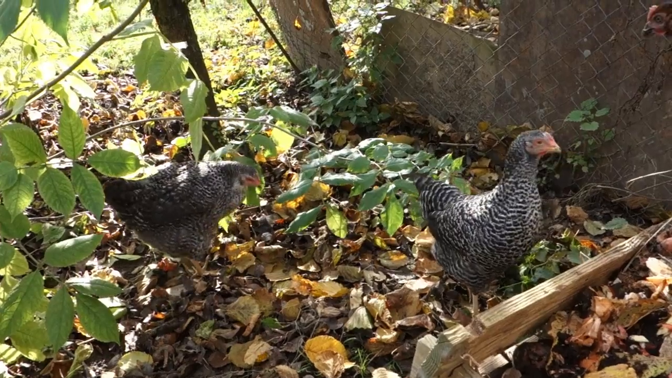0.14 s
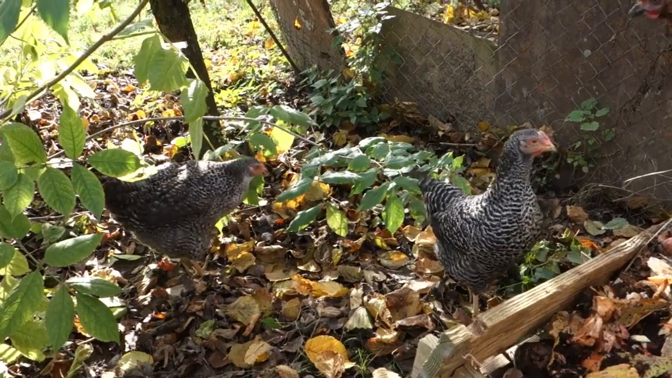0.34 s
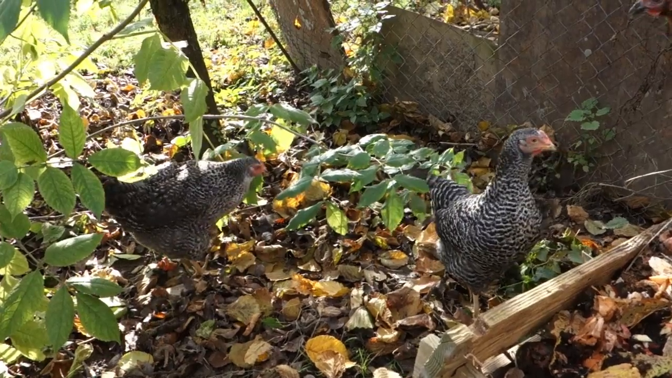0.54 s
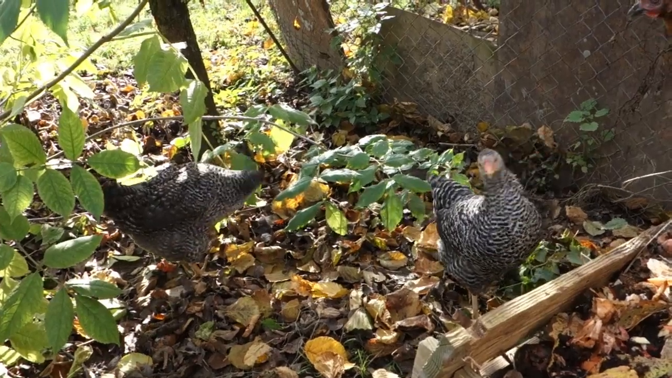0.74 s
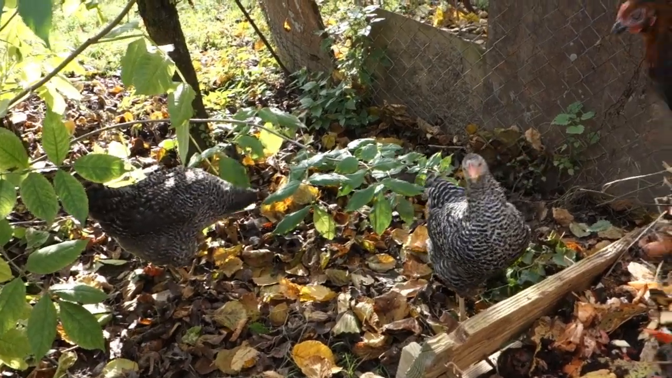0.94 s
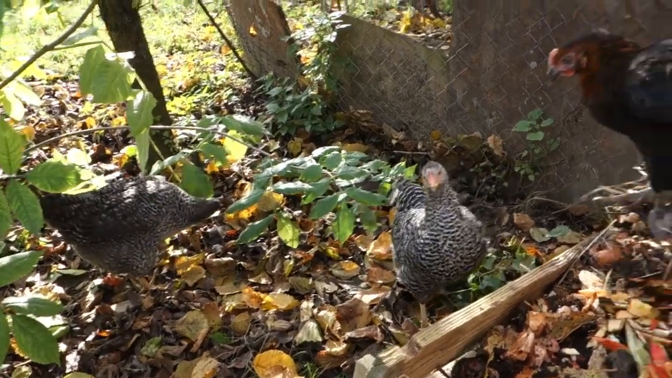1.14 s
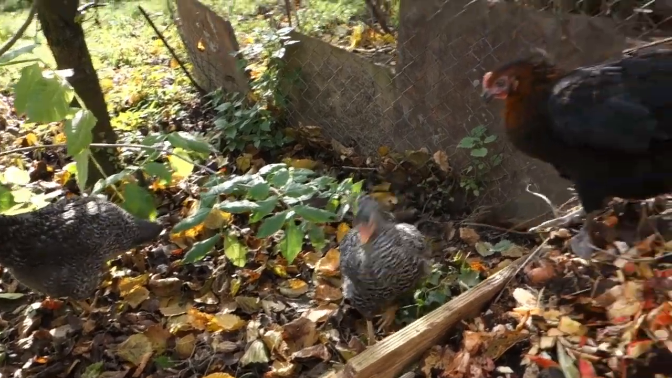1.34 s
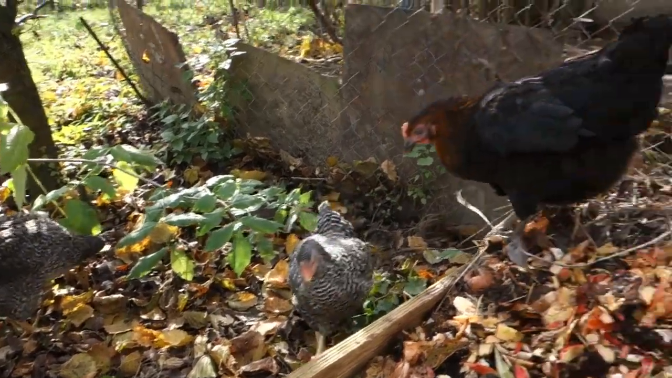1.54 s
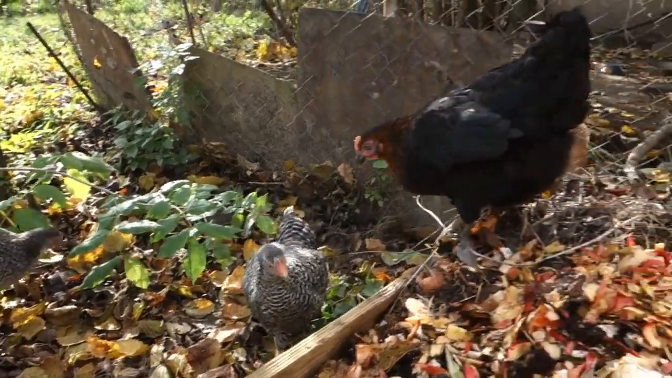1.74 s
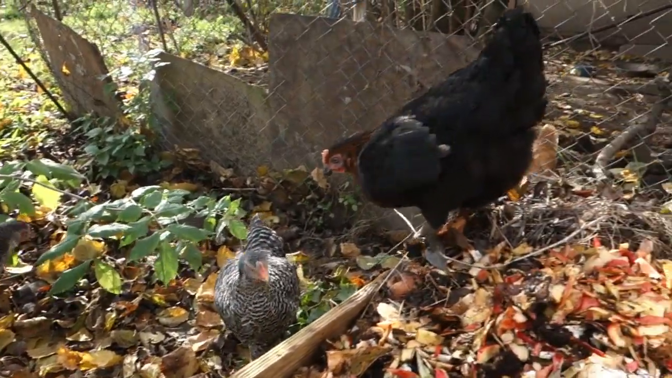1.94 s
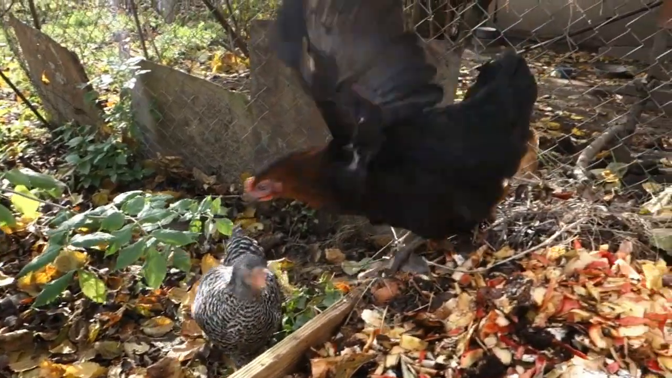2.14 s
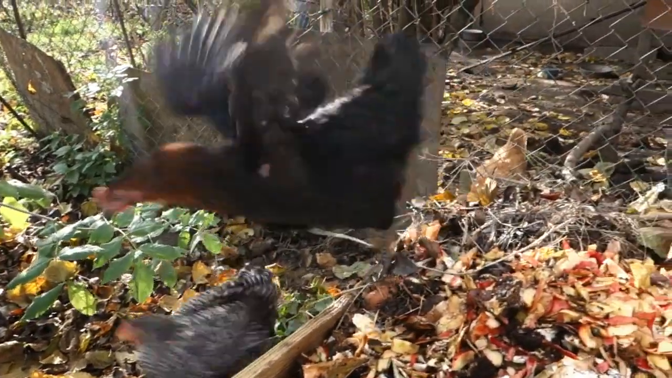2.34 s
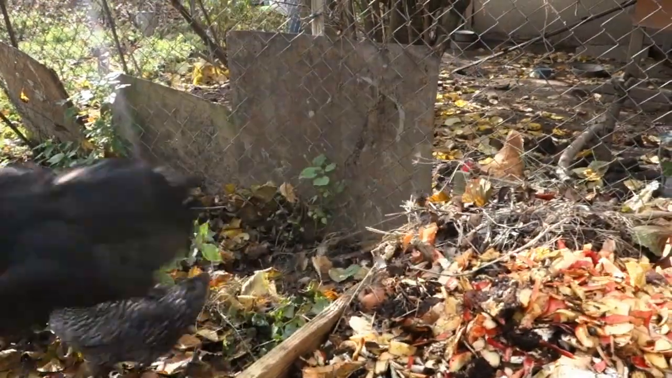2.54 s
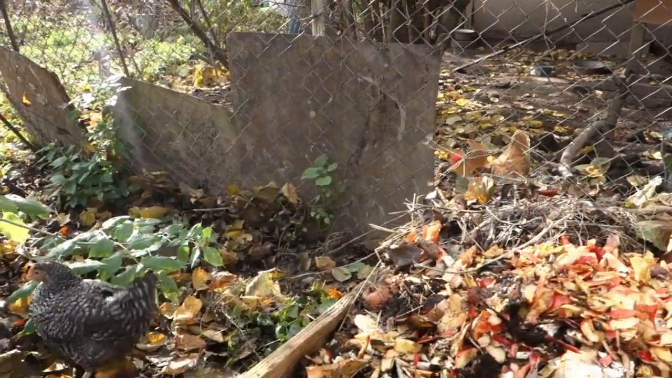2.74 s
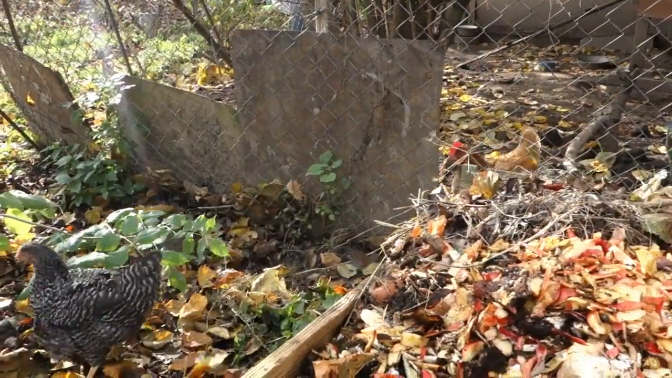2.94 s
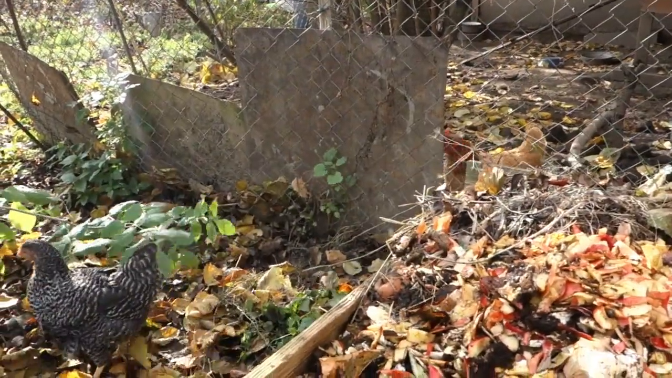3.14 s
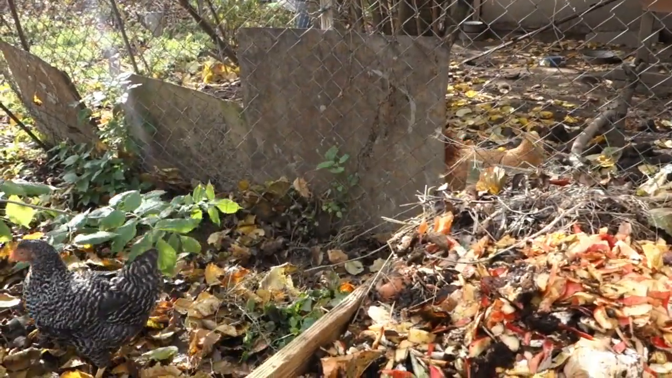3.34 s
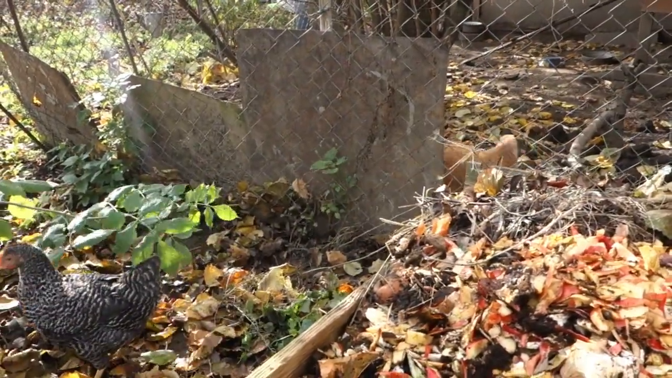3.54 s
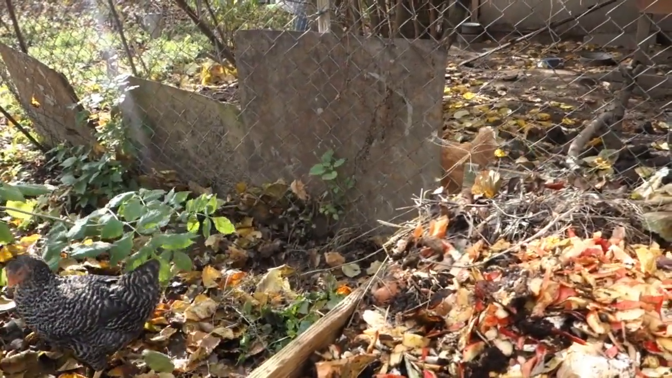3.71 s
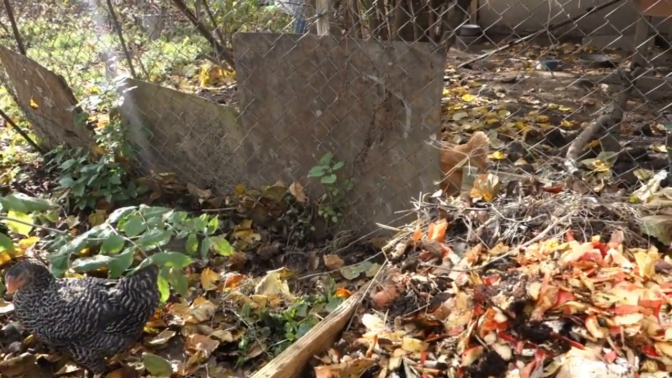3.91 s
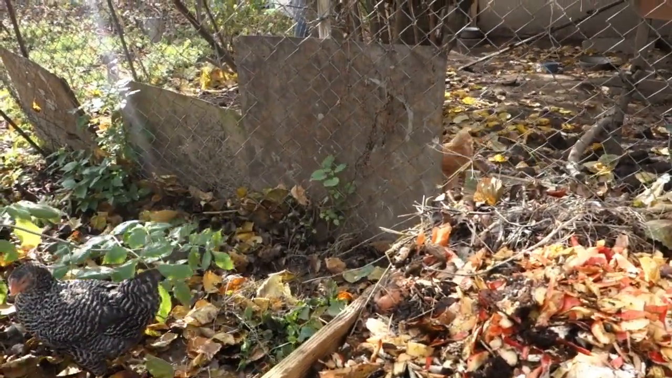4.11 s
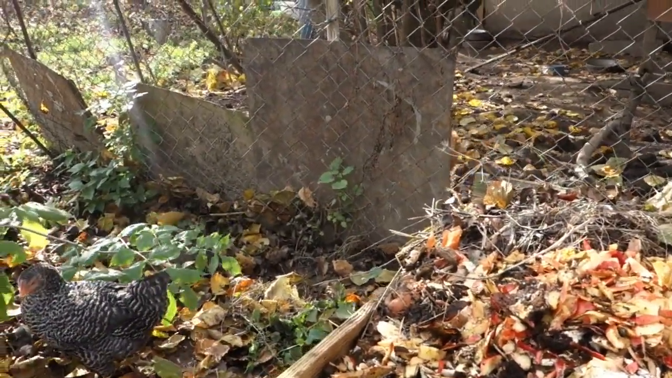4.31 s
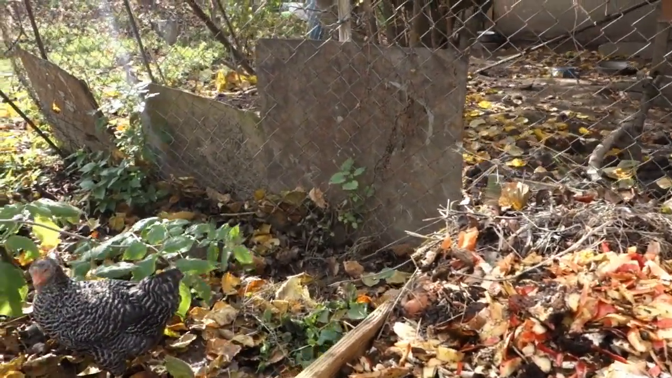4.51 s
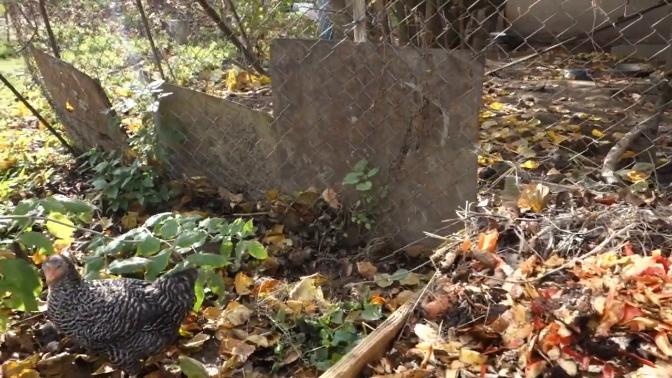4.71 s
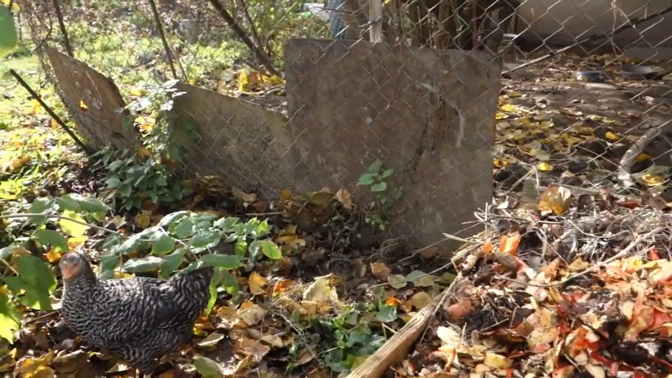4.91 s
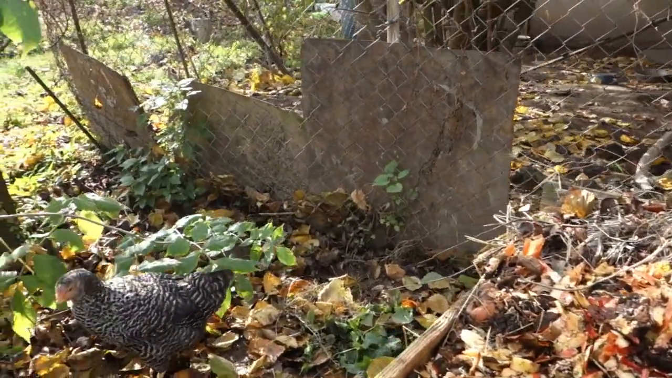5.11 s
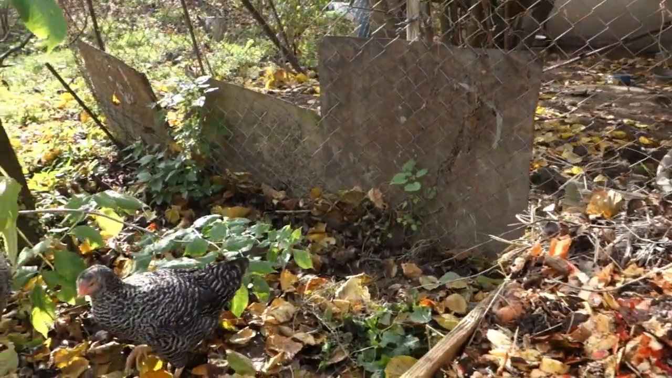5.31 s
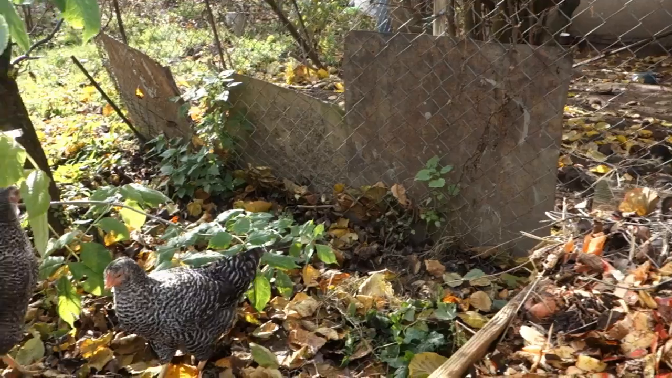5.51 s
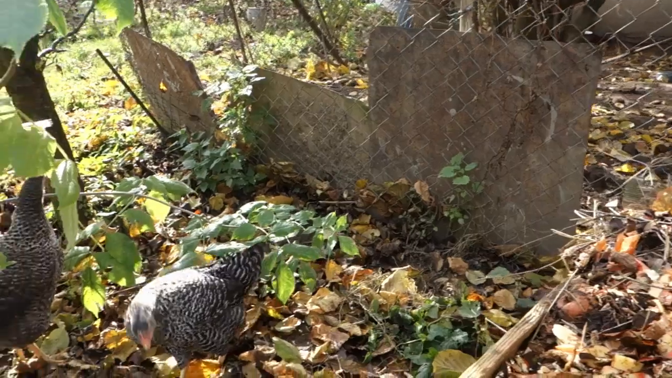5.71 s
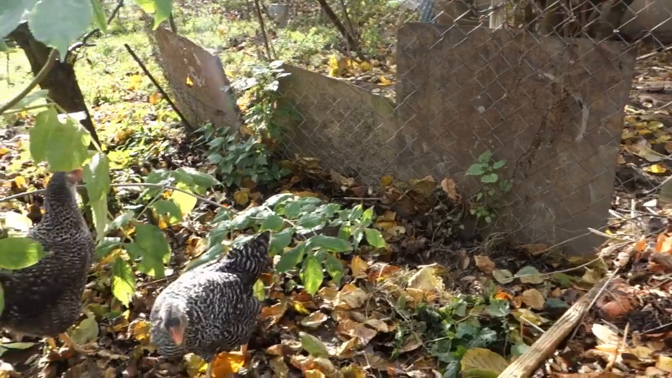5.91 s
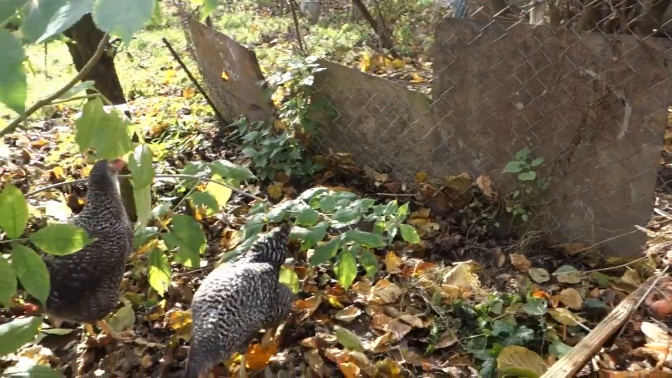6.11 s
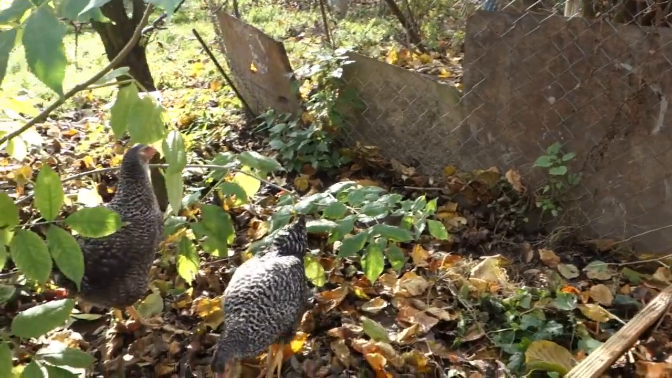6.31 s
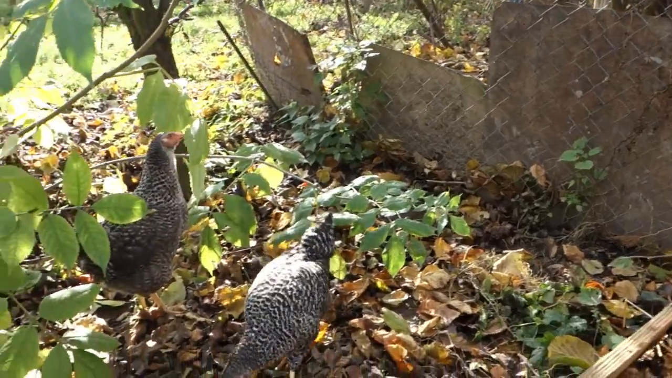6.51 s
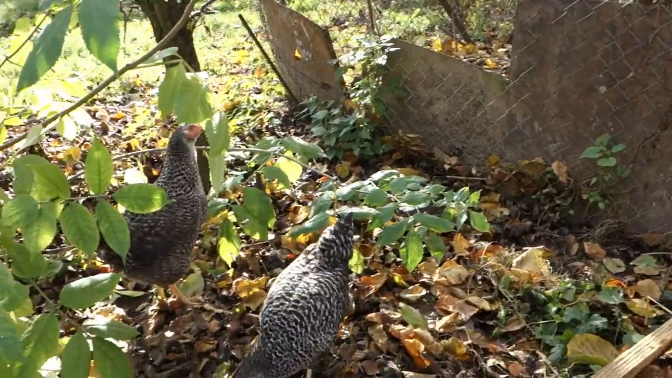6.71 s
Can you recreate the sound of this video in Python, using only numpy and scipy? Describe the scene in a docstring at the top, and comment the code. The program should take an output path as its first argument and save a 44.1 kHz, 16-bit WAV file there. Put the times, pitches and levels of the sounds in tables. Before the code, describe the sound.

Hens walk and scratch through dry fallen leaves in a garden, a couple of metres from the microphone. Sparse ticks grow into crisp crunching and snapping stalks. Before the midpoint a brief scuffle erupts, with rushing wingbeats and a sharp, loud wing clap. The steps then fade to a lull before light scratching and crackling return. Faint distant traffic murmurs underneath.

```python
"""Hens in dry leaves.

Hens step and scratch in a garden, a couple of metres from a stereo microphone. Each footfall crushes
a cloud of tiny crackles; stalks snap and leaves drag. In a brief scuffle, wings push air, rasp and clap.
A faint murmur of traffic and a far motor lie underneath."""
import sys
import numpy as np
from scipy import signal
from scipy.fft import rfft, irfft, next_fast_len
from scipy.io import wavfile
from scipy.ndimage import uniform_filter1d

SR = 44100
rng = np.random.default_rng(int(sys.argv[2]) if len(sys.argv) > 2 else 0)


def master_out(mix):
    """Clip the mix to full scale and print it as 16-bit PCM to the path in sys.argv[1]."""
    frames = np.transpose(np.atleast_2d(mix))
    ceiling = np.clip(frames, -1, 1)
    pcm = np.round(ceiling * 32767).astype(np.int16)
    wavfile.write(sys.argv[1], SR, pcm)


N = 297858
T = np.arange(N) / SR
TOP_HZ, HEAP_UNTIL_S = 11050, 1.9
SIDES = np.array([[1], [-1]])  # left, right

# Spectra of the noisy sources. Each row: frequency in Hz, relative level in dB.
MURMUR_SPECTRUM = [(25, -15), (50, -12.5), (100, -15.5), (160, -12.5), (240, -5.5), (350, -7), (520, -2),
                   (900, -2), (1200, -5.5), (1700, -8.5), (2600, -18.7), (3600, -19.7), (5000, -21.5),
                   (11000, -22)]
HEAP_SPECTRUM = [(300, -42), (1500, -13), (2300, -12), (2850, -0.5), (3400, 1.5), (4100, -0.5), (4700, -11),
                 (5600, -4), (8000, -4.5), (11000, -4.5)]  # stalky leaf heap
DRY_LEAF_SPECTRUM = [(300, -25.5), (1200, -12.5), (2100, -6.5), (3200, 0), (4200, -3), (5500, -2.3),
                     (8000, -3.3), (11000, -6.3)]
LITTER_SPECTRUM = [(60, -31), (150, -19.5), (280, -4.5), (500, 0.5), (900, 0), (1600, -1), (2300, -1),
                   (3500, -6.5), (8000, -9)]  # damp layer under the dry leaves
TREAD_SPECTRUM = [(60, -30), (180, -11), (300, -2.5), (560, 0), (900, -5), (1600, -15), (4000, -35)]
WING_AIR_SPECTRUM = [(30, -37), (70, -25.5), (135, -19), (210, -7), (310, -2.5), (390, -2.5), (510, 1.5),
                     (700, -3), (1000, -2), (1500, -5.5), (2200, -11), (5000, -23)]
FEATHER_SPECTRUM = [(300, -13), (950, 0), (1850, 1.5), (3000, 1), (5000, -2), (8000, -3.5), (11000, -7.5)]
# Spells of the motor's deep tone. Each row: start in seconds, end in seconds, level in dB.
MOTOR_SPELLS = [(0, 0.655, -79), (6.46, 6.55, -83.5)]
# Position of the busy hen. Each row: time in seconds, left minus right in dB.
HEN_PAN = [(0, -5.5), (.85, -8), (1.39, -6), (1.85, 0.5), (2.3, -1), (2.55, 0.14), (3.5, 2.5), (4.8, -3),
           (5.7, 0), (6.75, -1)]
# Walking and scratching. Each row: start in seconds, end in seconds, leaf level in dB,
# litter relative to leaves in dB.
SCRATCH_BOUTS = [(0.823, 0.93, -60.5, -8), (1.158, 1.24, -53.5, -20), (1.418, 1.65, -53.5, -23),
                 (1.97, 2.02, -54, -12.5), (2.13, 2.15, -58.5, -7), (2.228, 2.7, -48, -3.2),
                 (2.8, 3.363, -55, -1.5), (3.584, 3.723, -58, -2.5), (5.08, 5.31, -60, -23),
                 (5.6, 5.79, -53, -2.5), (5.908, 6.25, -63, 1), (6.493, 6.642, -55.5, -4.5)]
# Leaf or quill slips. Each row: peak time in seconds, level in dB, pitch in Hz, length in seconds.
LEAF_DRAGS = [(1.156, -55, 3530, 0.031), (1.204, -55, 3850, 0.014), (1.995, -53.5, 3500, 0.055),
              (2.855, -43, 1950, .022), (2.877, -41, 1900, .02), (5.127, -62, 3000, 0.024),
              (5.318, -62, 4100, .014), (5.813, -55, 3150, .012), (6.055, -58, 3300, .03),
              (6.157, -56.5, 2550, .024), (6.185, -59, 2400, .03), (6.221, -50, 2330, .027),
              (6.243, -57, 3100, .012), (6.326, -63, 3900, 0.024)]
# Breaking stalks and leaf ribs. Each row: time in seconds, level in dB, pitch in Hz, ring share 0-1.
STALK_SNAPS = [(.012, -41, 9000, .4), (.0175, -31.5, 8500, .4), (.067, -48, 4800, .1),
               (.135, -48, 3600, .3), (.1876, -44, 2800, .2), (.426, -52, 9000, .3), (.503, -52, 3400, .2),
               (.7015, -40, 6000, .2), (.869, -42, 3200, .7), (.9152, -43.5, 3170, .6),
               (1.0865, -48, 6000, .3), (1.124, -47, 5000, .3), (1.15, -42, 3400, .6),
               (1.2026, -39, 3800, .5), (1.2147, -38, 3200, .3), (1.2563, -41, 3900, .5),
               (1.2675, -45, 7500, .4), (1.34, -28.5, 3500, .55), (1.375, -27, 3500, .6),
               (1.4263, -41, 5500, .5), (1.4551, -36, 8200, .3), (1.466, -41, 8400, .7),
               (1.476, -42, 8000, .7), (1.5055, -34.5, 4900, .1), (1.5125, -42, 3400, .2),
               (1.5367, -28, 5300, .2), (1.5418, -31, 7400, .3), (1.547, -32, 8000, .3),
               (1.5528, -27, 7300, .3), (1.5765, -37, 7000, .3), (1.582, -40, 8500, .3),
               (1.6003, -32.5, 7500, .2), (1.604, -35, 3200, .6), (1.62, -33, 7000, .2),
               (1.632, -35, 7500, .3), (1.6805, -44, 3600, .3), (1.7764, -42.5, 5230, .4),
               (1.849, -41, 3580, .3), (1.9888, -29, 5300, .2), (2.0026, -36, 4580, .2),
               (2.0179, -32, 4000, .3), (2.1335, -27, 1900, .1), (2.136, -33, 5000, .1),
               (2.1564, -35, 4000, .5), (2.179, -38, 1900, .3), (2.2437, -34.5, 6000, .2),
               (2.312, -29, 3600, .5), (2.3225, -36, 6500, .6), (2.4627, -33, 3400, .4),
               (2.5045, -25, 3220, .4), (2.5161, -15.5, 3360, .4), (2.632, -22, 1050, .5),
               (2.8482, -29, 1400, .3), (2.8777, -23, 1700, .25), (2.962, -35, 1600, .1),
               (3.014, -32, 5500, .3), (3.0416, -29, 3500, .1), (3.0925, -38, 5500, .2),
               (3.164, -34, 3000, .1), (3.5746, -37, 2400, .1), (3.6511, -38, 3050, .7),
               (4.684, -54, 4120, .4), (4.882, -50, 7500, .4), (5.1225, -46, 3000, .5),
               (5.178, -50, 3700, .4), (5.2291, -46, 5500, .3), (5.278, -48, 4800, .3),
               (5.5, -45, 2900, .5), (5.5666, -40, 5000, .2), (5.59, -39, 3900, .5),
               (5.5968, -41, 4400, .3), (5.6365, -42, 2860, .3), (5.6675, -38, 1350, .8),
               (5.6704, -35, 1200, .7), (5.673, -30.5, 3300, .1), (5.691, -41, 905, .7),
               (5.7072, -25, 4000, .2), (5.7076, -37, 1600, .3), (5.712, -37, 3800, .7),
               (5.7615, -34, 7000, .3), (5.8109, -42, 3100, .4), (5.8352, -45, 2900, .5),
               (6.091, -46, 3800, .4), (6.124, -45, 2900, .4), (6.2424, -39, 3500, .1),
               (6.4598, -41, 5100, .2), (6.505, -43, 4500, .2), (6.5553, -43, 6000, .2),
               (6.6237, -45, 3500, .5), (6.644, -39, 7500, .6), (6.6484, -24.5, 8130, .9),
               (6.6664, -33.5, 7000, .85)]
# Footfalls, heavy and ordinary. Each row: peak time in seconds, level in dB, length in seconds.
HEAVY_TREADS = [(2.06, -60, .045), (2.134, -58, .009), (2.181, -50, .018), (2.28, -55, .04),
                (2.372, -47, .012)]
FOOTFALLS = [(0.86, -60, 0.052), (0.92, -56, 0.044), (1.089, -65, 0.04), (1.164, -53.5, 0.05),
             (1.209, -53, 0.037), (1.234, -52.5, 0.032), (1.297, -56, 0.015), (1.421, -52.5, 0.038),
             (1.457, -47, 0.024), (1.544, -38, 0.028), (1.613, -48, 0.032), (1.732, -57, 0.023),
             (1.779, -51.5, 0.014), (1.851, -46.5, 0.014), (1.941, -50.5, 0.044), (2.018, -43, 0.071),
             (2.058, -42, 0.026), (2.139, -42.5, 0.029), (2.183, -47, 0.045), (2.255, -45, 0.058),
             (2.327, -47, 0.046), (2.394, -39.5, 0.058), (2.472, -44, 0.048), (2.519, -35.5, 0.024),
             (2.555, -42, 0.04), (2.603, -35, 0.051), (2.956, -44.5, 0.072), (3.033, -39, 0.039),
             (3.092, -47.5, 0.03), (3.153, -42.5, 0.058), (3.277, -47, 0.088), (3.378, -51, 0.09),
             (3.559, -50, 0.07), (3.646, -51, 0.023), (3.723, -55, 0.025), (4.16, -66, 0.05),
             (4.34, -64, 0.07), (4.687, -61.5, 0.042), (4.874, -68, 0.021), (5.111, -52.5, 0.07),
             (5.232, -55, 0.021), (5.375, -57.5, 0.032), (5.499, -56, 0.059), (5.571, -48.5, 0.032),
             (5.595, -49.5, 0.035), (5.643, -48.5, 0.055), (5.676, -46, 0.044), (5.711, -43.5, 0.014),
             (5.757, -46.5, 0.021), (6.036, -55.5, 0.074), (6.109, -58, 0.068), (6.155, -57.5, 0.04),
             (6.22, -50.5, 0.046), (6.326, -60.5, 0.05), (6.462, -50, 0.052), (6.566, -56.5, 0.065)]
# Blows of wings and feet. Each row: start in seconds, level in dB, pitch in Hz, T60 in seconds.
SCUFFLE_THUDS = [(2.503, -42, 299, .06), (2.507, -54, 85, .06), (2.634, -34, 318, .05),
                 (2.644, -46, 152, .021), (2.654, -33.5, 312, .048), (2.677, -22, 515, .029),
                 (2.68, -33, 205, .04), (2.692, -37, 320, .05), (2.697, -39, 219, .1),
                 (2.758, -28.5, 754, .045), (2.788, -46.5, 191, .11)]
# Wing strokes. Each row: peak time in seconds, level in dB, length in seconds,
# relative feather level in dB, pitch of the hollow under the wing in Hz.
WING_STROKES = [(2.374, -47.5, .03, -3, 600), (2.494, -43.5, .012, -7, 560), (2.506, -34.5, .0071, 3, 450),
                (2.52, -34, .018, 2, 560), (2.555, -36, .032, -3.5, 560), (2.603, -42.5, .05, 6.5, 560),
                (2.622, -38, .02, -1, 560), (2.634, -29, .012, 3, 720), (2.658, -32, .019, -4, 640),
                (2.679, -30.5, .018, 4.5, 560), (2.697, -36, .025, 0, 600), (2.737, -42, .016, -5, 680),
                (2.763, -32.5, .027, 1.5, 760), (2.82, -41.5, .07, -13, 460), (2.876, -38, .034, 3.5, 600)]
# Ring of a clapped wing. Each row: frequency in Hz, T60 in seconds, relative level in dB.
CLAP_MODES = [(308, 0.13, -19), (483, 0.025, -15), (750, 0.01, -7), (1550, 0.0088, -4.5)]
# Wing tips meeting. Each row: start in seconds, level in dB, pulse corner in Hz, air rebound 0-1.
WING_CLAPS = [(2.6706, -4.5, 2500, .14), (2.6761, -3.5, 3000, .3), (2.6793, -9, 800, .35),
              (2.683, -14, 2200, .15)]


def undb(db):
    """Decibels to gain."""
    return 10 ** (np.asarray(db) / 20)


def unit(x):
    """Scale to rms 1."""
    return x / np.sqrt(np.mean(x ** 2))


def decay(t, t60_s):
    """Exponential fall of 60 dB in t60_s."""
    return np.exp(-np.log(1000) * t / t60_s)


def butter(x, order, hz, kind="low"):
    """Butterworth filter."""
    return signal.sosfilt(signal.butter(order, hz, kind, fs=SR, output="sos"), x)


def colour(x, spectrum):
    """Filter by a spectrum table, keeping the power of white noise."""
    hz, db = np.transpose(spectrum)
    f = np.fft.rfftfreq(x.shape[-1], 1 / SR)
    gain = undb(np.interp(np.log(f + 1), np.log(hz), db)) * (f < TOP_HZ + 1000)
    return irfft(rfft(x) * unit(gain), x.shape[-1])


def resonance(x, hz, width_hz):
    """One resonance with a moving centre, rms 1."""
    carrier = np.exp(2j * np.pi * np.cumsum(hz) / SR)
    return unit((butter(x / carrier, 2, width_hz) * carrier).real)


def wander(rate_hz):
    """Smooth random curve, spread near 1."""
    hold = int(SR / rate_hz)
    stairs = np.repeat(rng.standard_normal(N // hold + 1), hold)
    return 1.3 * uniform_filter1d(uniform_filter1d(stairs, hold), hold)[:N]


def spell(start_s, end_s, rise_s, fall_s):
    """Gain that rises until start_s, holds, and falls after end_s."""
    return np.exp(-np.maximum(0, np.maximum((start_s - T) / rise_s, (T - end_s) / fall_s)))


def swell(length_s, rise_share):
    """Time axis and gain about a peak; the rise and fall time constants sum to length_s."""
    rise_s = length_s * rise_share
    fall_s = length_s - rise_s
    start_s = -5 * rise_s
    t = start_s + np.arange(next_fast_len(int(6 * fall_s * SR - start_s * SR) + 256)) / SR
    return t, np.exp(-np.maximum(-t / rise_s, t / fall_s))


def place(x, at_s, aside_ms=0, aside_db=0, ahead_ms=0.033, ms_per_db=0.015):
    """Pan to the hen's position: the nearer channel is earlier and louder."""
    pan_db = np.interp(at_s, *np.transpose(HEN_PAN))
    lead_ms = ahead_ms + ms_per_db * pan_db + aside_ms
    f = np.fft.rfftfreq(len(x), 1 / SR)
    shift = np.exp(2j * np.pi * f * lead_ms / 1000 * SIDES / 2)
    return irfft(rfft(x) * shift, len(x)) * undb((pan_db + aside_db) * SIDES / 2)


def add(out, x, start_s):
    """Mix x into out from start_s on."""
    offset = int(round(start_s * SR))
    first, last = max(offset, 0), min(offset + x.shape[1], N)
    out[:, first:last] += x[:, first - offset:last - offset]


def fractures(size, per_s, spread_db):
    """Random tiny impulses: many weak, a few strong."""
    strength = undb(spread_db * np.minimum(rng.exponential(size=size), 4))
    return unit(rng.choice([-1, 1], size) * strength * (rng.random(size) < per_s / SR) + 1e-9)


def crackle(size, at_s, spectrum, per_s, spread_db, scatter_ms, patchy_db, wide_db=4, count=4):
    """Leaves or feathers crackle side by side, each with its own resonances."""
    hz = np.geomspace(100, 12000, 56)
    table_hz, table_db = np.transpose(spectrum)
    base_db = np.interp(np.log(hz), np.log(table_hz), table_db)
    out = 0
    for aside in np.linspace(-1, 1, count):
        own_spectrum = np.column_stack([hz, base_db + patchy_db * rng.standard_normal(len(hz))])
        leaf = colour(fractures(size, per_s / count, spread_db), own_spectrum)
        out = out + place(leaf, at_s, aside * scatter_ms, aside * wide_db)
    return out / np.sqrt(count)


def traffic_murmur(level_db=-60.77, wide_hz=3400, bass_width=0.31, drift_db=.6):
    """Distant traffic and air: a wash with drifting octaves, nearly mono in the bass."""
    f = np.fft.rfftfreq(N, 1 / SR)
    mid, side = colour(rng.standard_normal((2, N)), MURMUR_SPECTRUM)
    for hz in (250, 500, 1000, 2000):
        octave = np.maximum(0, 1 - np.abs(np.log2((f + 1) / hz)))
        mid = mid + irfft(rfft(mid) * octave, N) * (undb(drift_db * wander(4)) - 1)
    width = np.minimum(np.hypot(bass_width, f / wide_hz), 1)
    side = irfft(rfft(side) * width, N)
    return (mid + side * SIDES) * undb(level_db + .5 * wander(0.98) + 0.057 * wander(10))


def far_motor(deep_hz=66, hum_hz=220, steady_hum_db=-84.5, early_hum_db=-79.5, rise_s=.05):
    """A deep tone in spells, and a hum that wavers on its way through the air."""
    deep = np.sin(2 * np.pi * np.cumsum(deep_hz * (1 + .015 * wander(7.9))) / SR)
    hum = ((wander(75) + 1j * wander(75)) * np.exp(2j * np.pi * hum_hz * T)).real
    deep_gain = sum(undb(db) * spell(start_s, end_s, rise_s, fall_s=.17)
                    for start_s, end_s, db in MOTOR_SPELLS)
    hum_gain = undb(steady_hum_db) + undb(early_hum_db) * spell(0, 1.0, rise_s, fall_s=0.43)
    return unit(deep) * deep_gain + unit(hum) * hum_gain


def garden_echo(x, near_db=-13, near_t60_s=0.39, far_db=-25, far_t60_s=1.0, mono_below_hz=1500):
    """Ground, slabs and bushes add a short echo; farther walls add a faint tail."""
    t = np.arange(SR // 2) / SR
    out = x
    for db, t60_s in ((near_db, near_t60_s), (far_db, far_t60_s)):
        echo = rng.standard_normal((2, len(t))) * decay(t, t60_s) * (t > .002)
        echo += butter(echo.mean(0) - echo, 1, mono_below_hz)
        out = out + undb(db) * signal.fftconvolve(x, unit(echo) / np.sqrt(len(t)), axes=1)[:, :N]
    return out


def stirring(damp=False, rise_s=0.053, fall_s=0.19, rest_db=-73):
    """Gain of the dry leaves or damp litter: quick to stir, slow to settle, never quite still."""
    gains = [undb(db + damp * litter_db) * spell(start_s, end_s, rise_s, fall_s)
             for start_s, end_s, db, litter_db in SCRATCH_BOUTS]
    return np.hypot(undb(rest_db), np.linalg.norm(gains, axis=0))


def settling_leaves(heap_share=0.33, gain_db=-6, flicker_db=2.4):
    """Stirred leaves keep up a fine, uneven crackle over the dull shuffle of turned litter."""
    heap, ground = (crackle(N, 0, leaves, per_s=1800, spread_db=4.3, scatter_ms=0.062, patchy_db=2.5)
                    for leaves in (HEAP_SPECTRUM, DRY_LEAF_SPECTRUM))
    share = heap_share * (T < HEAP_UNTIL_S)
    fine = np.sqrt(share) * heap + np.sqrt(1 - share) * ground
    dull = crackle(N, 0, LITTER_SPECTRUM, per_s=3000, spread_db=2.5, scatter_ms=0.031,
                   patchy_db=1.5, count=2)
    times_s, pans_db = np.transpose(HEN_PAN)
    follow_hen = undb((np.interp(T, times_s, pans_db) - pans_db[0]) * SIDES / 2)
    rustle = fine * stirring() + dull * stirring(damp=True)
    return undb(gain_db + flicker_db * wander(25)) * follow_hen * rustle


def leaf_drags(width_hz=380, sink_hz_per_s=5000):
    """Quick slips ring a resonance that sinks as the leaf or quill is pulled flat."""
    out = np.zeros((2, N))
    for at_s, db, hz, length_s in LEAF_DRAGS:
        t, pull = swell(length_s, rise_share=.6)
        slips = fractures(len(t), per_s=1200, spread_db=2.2)
        ring = resonance(slips, hz - sink_hz_per_s * t, width_hz)
        add(out, place(ring * pull * undb(db), at_s), at_s + t[0])
    return out


def snap(at_s, db, hz, ring_share, aside_ms=0, crack_t60_s=.0035, shiver_t60_s=0.048, shiver_db=-23):
    """A stalk cracks and rings in two bending modes; its leaf shivers on. Returns sound and start."""
    t = np.arange(-64, 1472) / SR
    ring_t60_s = 0.0067 * min(1, 3480 / hz) ** 1.3  # thinner stalks die away faster
    fade, burst, shiver = ((t >= 0) * decay(np.abs(t), t60_s)
                           for t60_s in (ring_t60_s, crack_t60_s, shiver_t60_s))
    ring = np.sin(2 * np.pi * hz * t) + 0.36 * np.sin(2 * np.pi * min(1.14 * hz, TOP_HZ) * t)
    # Thick stalks crack duller; thin, springy ones radiate little below their first mode.
    high_hz = min(3.2 * hz, TOP_HZ)
    low_hz = min(0.77 * hz, 2900 / (1 - .55 * ring_share ** 2))
    splinters = unit(butter(rng.standard_normal(len(t)), 2, high_hz))
    crack = splinters * ((1 - ring_share) * burst + undb(shiver_db) * shiver)
    x = butter(ring_share * ring * fade + crack, 6, low_hz, "high")
    return place(x / np.abs(x).max() * undb(db + 1.5), at_s, aside_ms), at_s + t[0]


def stalk_snaps(tick_count=190, tick_db=6, range_db=8.5):
    """Loud snaps, plus faint random ticks of trodden leaves springing back."""
    out = np.zeros((2, N))
    stir_db = 20 * np.log10(stirring())
    for row in STALK_SNAPS:
        add(out, *snap(*row))
    for when, size, pitch, aside in rng.random((tick_count, 4)):
        i = int(when * N)
        db = stir_db[i] + tick_db + range_db * size ** 2
        add(out, *snap(i / SR, db, hz=2800 * 3 ** pitch, ring_share=.4, aside_ms=0.13 * (aside - .5)))
    return out


def heavy_treads():
    """A hen's full weight packs the litter down with a muffled crunch."""
    out = np.zeros((2, N))
    for at_s, db, length_s in HEAVY_TREADS:
        t, press = swell(length_s, rise_share=.25)
        crunch = colour(fractures(len(t), per_s=3000, spread_db=1.5), TREAD_SPECTRUM)
        add(out, place(crunch, at_s) * press * undb(db), at_s + t[0])
    return out


def footsteps():
    """Feet crush dry leaves, first on the heap, then on the ground; damp litter scuffs below."""
    out = np.zeros((2, N))
    starts_s, ends_s, _, litter_db = np.transpose(SCRATCH_BOUTS)
    for at_s, db, length_s in FOOTFALLS:
        t, press = swell(length_s, rise_share=.38)
        nearest_bout = np.argmin(np.maximum(starts_s - at_s, at_s - ends_s))
        leaves = HEAP_SPECTRUM if at_s < HEAP_UNTIL_S else DRY_LEAF_SPECTRUM
        crisp = crackle(len(t), at_s, leaves, per_s=3400, spread_db=3.3, scatter_ms=0.017,
                        patchy_db=3.5, wide_db=7.5)
        damp = crackle(len(t), at_s, LITTER_SPECTRUM, per_s=4000, spread_db=3, scatter_ms=0.042,
                       patchy_db=4.5)
        add(out, (crisp + undb(litter_db[nearest_bout]) * damp) * press * undb(db - 1.2), at_s + t[0])
    return out


def scuffle_thuds(rise_s=0.001):
    """Soft blows of wings and feet boom briefly."""
    out, t = np.zeros((2, N)), np.arange(8192) / SR
    for at_s, db, hz, t60_s in SCUFFLE_THUDS:
        boom = np.sin(2 * np.pi * hz * t) * (1 - np.exp(-t / rise_s)) * decay(t, t60_s)
        add(out, place(boom / np.abs(boom).max() * undb(db), at_s), at_s)
    return out


def wingbeats(push_db=-2.5, hollow_db=-5.5, eddy_db=-20, sink_hz_per_s=1200):
    """Strokes push air and feathers rasp; the hollow's resonance sinks as the wing spreads."""
    out = np.zeros((2, N))
    for at_s, db, length_s, feather_db, hollow_hz in WING_STROKES:
        t, speed = swell(length_s, rise_share=.42)
        push, eddy = colour(rng.standard_normal((2, len(t))), WING_AIR_SPECTRUM)
        hollow = resonance(rng.standard_normal(len(t)), hollow_hz - sink_hz_per_s * t, width_hz=160)
        air = place(undb(push_db) * push + undb(hollow_db) * hollow, at_s) + undb(eddy_db) * eddy * SIDES
        rasp = crackle(len(t), at_s, FEATHER_SPECTRUM, per_s=7000, spread_db=2.5, scatter_ms=0.031,
                       patchy_db=4.5)
        add(out, (air + undb(feather_db) * rasp) * speed * undb(db), at_s + t[0])
    return out


def wing_claps(ring_gain=.5, quill_gain=.3, quill_t60_s=.004, low_hz=160):
    """Wings meet: a sharp pressure pulse, a rattle of quills and a short hollow ring."""
    out, t = np.zeros((2, N)), np.arange(4096) / SR
    ring = sum(undb(db) * np.cos(2 * np.pi * hz * t) * decay(t, t60_s) for hz, t60_s, db in CLAP_MODES)
    for at_s, db, hz, rebound in WING_CLAPS:
        pulse = np.exp(-2 * np.pi * hz * t) - rebound * np.exp(-2 * np.pi * hz * rebound * t)
        quills = colour(rng.standard_normal(len(t)), FEATHER_SPECTRUM) * decay(t, quill_t60_s)
        body = butter(pulse / pulse.max() + ring_gain * ring, 1, low_hz, "high")
        clap = body / np.abs(body).max() + quill_gain * quills
        add(out, place(clap * undb(db - 1), at_s), at_s)
    return out


def scene():
    """Hens and their garden echo over the distant background."""
    leaves = footsteps() + heavy_treads() + settling_leaves() + stalk_snaps() + leaf_drags()
    scuffle = wingbeats() + wing_claps() + scuffle_thuds()
    return garden_echo(leaves + scuffle) + traffic_murmur() + far_motor()


def record(dry, low_hz=45):
    """The microphone thins the deepest bass and cuts the top steeply."""
    thinned = butter(dry, 2, low_hz, "high")
    return signal.sosfilt(signal.ellip(10, .2, 70, TOP_HZ, fs=SR, output="sos"), thinned)


dry = scene()
out = record(dry)
master_out(out)
```